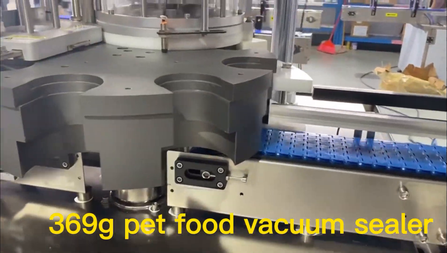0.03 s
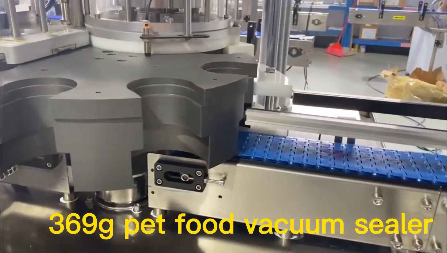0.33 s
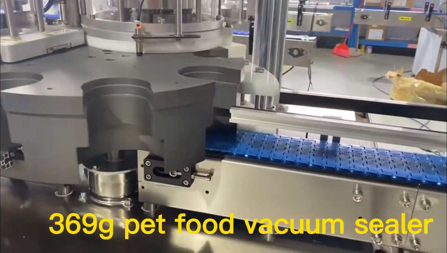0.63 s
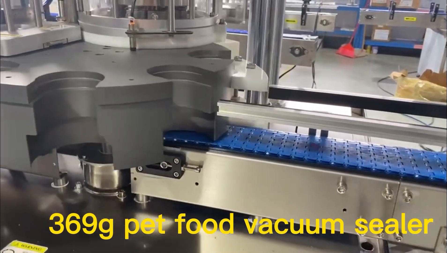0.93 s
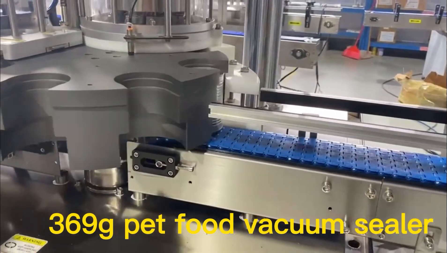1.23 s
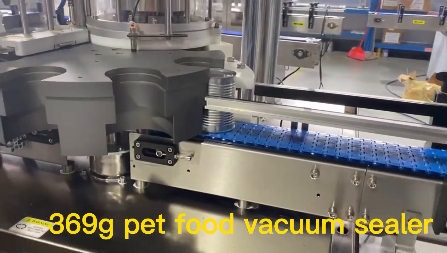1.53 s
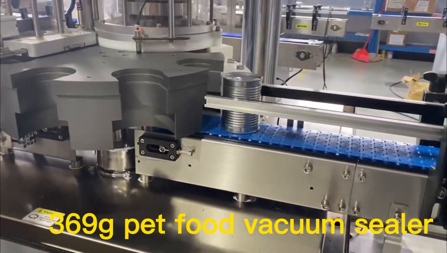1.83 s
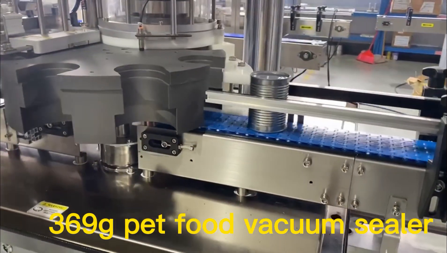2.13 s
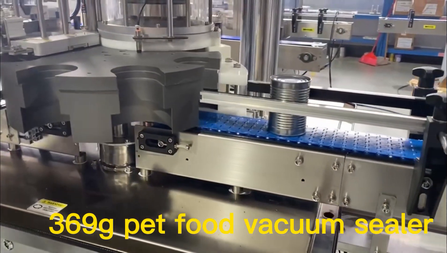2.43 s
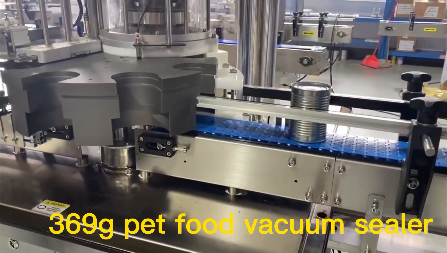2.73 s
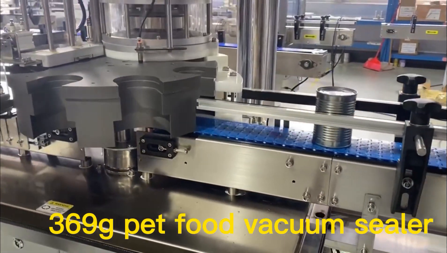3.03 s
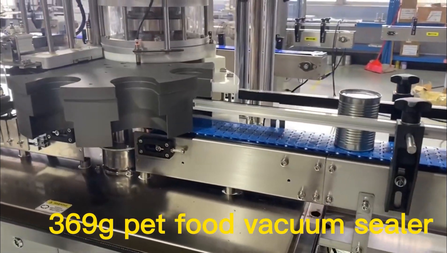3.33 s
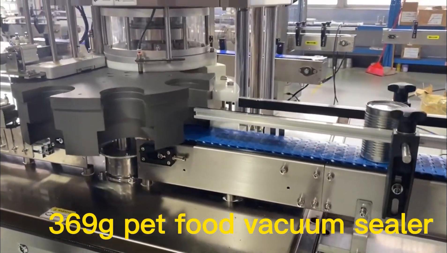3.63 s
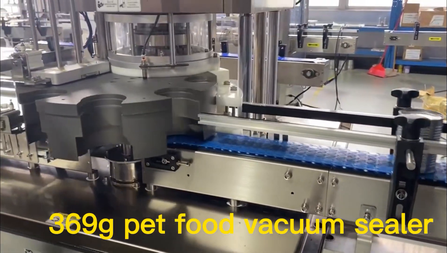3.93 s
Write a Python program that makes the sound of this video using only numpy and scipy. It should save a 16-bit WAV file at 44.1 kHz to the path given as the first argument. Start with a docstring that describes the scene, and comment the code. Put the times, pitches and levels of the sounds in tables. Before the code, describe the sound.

A can sealing machine runs in a workshop, its motors and conveyor rumbling with dull thumps and air puffs. A loud hiss bursts out, a can clinks along a rail, then a thin leak whistles as the clunks return.

```python
"""A rotary can sealer runs in a workshop: motors hum, the conveyor rumbles, the star wheel thumps dully.
First valves puff, the linkage taps and the mechanism clunks. At 1.3 s the vacuum chamber vents in a loud
hiss and a latch knocks. Near 2 s a can clinks along the rail as the belt carries it out. From 2.4 s air
leaks with a slowly sinking whistle. After 3 s the puffs and clunks return, and rubbed metal sings."""
import sys
import numpy as np
from scipy import signal
from scipy.fft import rfft, irfft, next_fast_len
from scipy.io import wavfile

SR = 44100
rng = np.random.default_rng(int(sys.argv[2]) if len(sys.argv) > 2 else 0)


def store_pcm(level_fs):
    """Save levels as 16-bit WAV."""
    pcm = np.round(np.clip(level_fs, -1, 1) * 32767).astype(np.int16)
    wavfile.write(sys.argv[1], SR, np.atleast_2d(pcm).T)


N = 176400
TIME = np.arange(N) / SR
FREQS = np.maximum(np.fft.rfftfreq(N, 1 / SR), 1)


# The chamber vents through a thin jet, then a wide port. Each row: start in seconds, level in dB,
# seconds held open, sag in dB per second, seconds to fade by 60 dB.
JET_OPENING = [(1.316, -18.5, 0.37, 6, 0.53)]
PORT_OPENING = [(1.43, -20, 0.038, 5, 0.8)]
# The tone colour of each hiss. Each row: frequency in Hz, relative level in dB.
JET_COLOUR = [(250, -3), (450, 1.5), (1300, 2.5), (2500, 4.5), (4000, 0), (6500, 1), (8000, -5), (11500, 1)]
PORT_COLOUR = [(500, 3), (1400, -7), (3300, 3), (4800, 6), (6300, -23), (12000, -30)]
# The chamber's resonances. Each row: frequency in Hz, boost in dB (a dip if negative).
CHAMBER_RESONANCES = [(938, 30.5), (1610, 18.5), (2010, 15), (2175, 1), (2440, -13), (2640, 12), (2992, 22),
                      (3380, 12.5), (3760, 10.5), (4580, -2), (4870, 5), (5600, -26), (7430, 17)]

def vent(jet_share=0.45):
    """The seal squeaks, then air rushes through the vacuum chamber and sounds its resonances."""
    squeak_level = from_db(-32) * np.exp(-((TIME - 1.286) / 0.010) ** 2)
    squeak = squeak_level * reedy_tone(hz=2170, width_hz=16)
    weaker_resonances = [(hz, jet_share * boost) for hz, boost in CHAMBER_RESONANCES]
    jet = valve_flow(JET_OPENING, attack_s=0.012) * noise(JET_COLOUR, weaker_resonances, ragged_db=5)
    port = valve_flow(PORT_OPENING, attack_s=0.046) * noise(PORT_COLOUR, CHAMBER_RESONANCES)
    sputter = from_db(drift(31))
    return squeak + (jet + port) * sputter


# The valves open. Each row: start in seconds, level in dB, seconds held open,
# sag in dB per second (a rise if negative), seconds to fade by 60 dB.
PUFFS = [(.158, -23.5, 0.018, 34, 0.34), (.22, -32, 0.16, -5, 0.14), (1.302, -16.5, 0.0063, 19, 0.071),
         (1.797, -24, 0.037, 30, 0.2), (2.2, -28.5, 0.042, 17, 0.18), (2.32, -23, 0.006, 50, 0.055),
         (3.258, -26.5, 0.06, 26, 0.15), (3.33, -34.5, 0.14, -8, 0.24)]
# The colour of a puff. Each row: frequency in Hz, relative level in dB.
PUFF_COLOUR = [(300, -41), (700, 3.5), (1300, 5), (2200, 2), (3200, -1), (5500, -2), (7500, -3),
               (12000, -3)]

def valves(sputter_db=2.0):
    """Valves let out short, sputtering puffs of exhaust air."""
    return valve_flow(PUFFS, attack_s=0.0083) * from_db(sputter_db * drift(47)) * noise(PUFF_COLOUR)


# Metal parts hit each other. Each row: start in seconds, relative level in dB.
CLUNKS = [(.349, -14.5), (.364, -22), (1.318, -23), (3.449, -18), (3.459, -18.5)]
KNOCKS = [(1.648, -14)]
TAPS = [(.165, -31), (.177, -25), (.292, -23), (.322, -27), (3.399, -25.5)]
# The tones each part rings with. Each row: pitch in Hz, relative level in dB, seconds to fade by 60 dB.
MECHANISM_TONES = [(331, 5.5, 0.082), (482, 3, .025), (590, -0.5, 0.033), (770, -5, .03),
                   (1084, -1.5, 0.097), (1226, 0, 0.04), (1313, 1.5, 0.032)]
LATCH_TONES = [(578, 4, 0.077), (733, 0.5, 0.086), (820, -3, .08)]
LINKAGE_TONES = [(1844, -2, 0.019), (2074, 0, 0.048), (2243, -2.9, 0.045)]

def mechanism():
    """The indexing mechanism, which steps the cans along, clunks; a latch knocks and the linkage taps."""
    clunks = struck(CLUNKS, MECHANISM_TONES)
    knocks = struck(KNOCKS, LATCH_TONES)
    taps = struck(TAPS, LINKAGE_TONES)
    return from_db(-5.5) * (clunks + knocks + taps)


# The can hits the guide rail. Each row: start in seconds, relative level in dB.
CLINKS = [(1.961, -22.5), (1.972, -23), (1.985, -26.5), (2.018, -25), (2.027, -29), (2.06, -27.5),
          (2.324, -33.5)]
# The can's ringing tones. Each row: pitch in Hz, relative level in dB, seconds to fade by 60 dB.
CAN_TONES = [(1078, 6, 0.072), (1250, -12, 0.064), (2998, 3, 0.08), (3050, -8, 0.23), (3940, -5.5, 0.075),
             (5039, -2.5, 0.13), (5630, -9, .1), (6142, -9, .13), (7485, 1.5, 0.11), (9950, -12, 0.12),
             (11750, -11.5, 0.14)]

def can(contact_s=0.0052):
    """The can chatters along the rail in short bounces, ringing and scraping at each."""
    ring = from_db(-8.5) * struck(CLINKS, CAN_TONES, contact_s, grit=0.11)
    scrape_level = sum(from_db(db) * (TIME > s) * np.exp(-abs(TIME - s) / contact_s) for s, db in CLINKS)
    return ring + scrape_level * rng.standard_normal(N)


# How loud the leak hisses. Each row: time in seconds, level in dB.
LEAK_LEVEL = [(0, -47), (.12, -31), (.3, -47), (2.38, -65), (2.45, -38.5), (2.8, -37.5), (3.06, -29.5),
              (3.2, -34.5), (3.29, -24.5), (3.49, -29.5), (3.72, -28.5), (3.8, -35), (3.88, -29)]
# The colour of that hiss. Each row: frequency in Hz, relative level in dB.
LEAK_COLOUR = [(1500, -6), (3000, 0.5), (5500, 2), (7000, 2), (12000, 6)]
# The leak's whistle. Each row: time in seconds, pitch in Hz, relative level in dB.
WHISTLE = [(2.4, 7800, -59), (3.05, 7060, -48.5), (3.3, 6780, -41), (3.5, 6765, -40), (3.71, 6585, -37),
           (4, 6410, -46)]

def leak(lock_db=-42):
    """A thin hiss whose whistle sinks with the pressure, airy until strong enough to lock into a tone."""
    hiss_db, = in_time(LEAK_LEVEL)
    hz, whistle_db = in_time(WHISTLE)
    locked = from_db(np.minimum(whistle_db - lock_db, 0))
    clear = locked * reedy_tone(hz, width_hz=14)
    airy = from_db(2) * reedy_tone(hz, width_hz=150)
    hiss = from_db(hiss_db) * noise(LEAK_COLOUR, ragged_db=10.5)
    return hiss + from_db(whistle_db) * (clear + airy)


# The tones of rubbed metal. Each row: pitch in Hz, relative level in dB.
ROLLER_TONES = [(3731, -40.5), (3865, -41), (5010, -43), (5529, -39.5), (6686, -32.5), (10282, -39),
                (11063, -39)]

def rollers():
    """Rubbed metal, probably the seaming rollers, swells near the end with a rasp around each tone."""
    swell_db = np.interp(TIME, [3.1, 3.55, 3.82, 3.93], [-60, -13, -7, 0])
    out = 0
    for hz, db in ROLLER_TONES:
        tone = reedy_tone(hz, width_hz=16)
        rasp = from_db(-6) * reedy_tone(hz, width_hz=70)
        out += from_db(db) * (tone + rasp)
    return from_db(swell_db) * out


# How loud the drive rumbles. Each row: time in seconds, level in dB.
RUMBLE_LEVEL = [(0, -17.5), (.4, -20), (.6, -30), (.9, -41), (1.27, -30.5), (1.85, -22.5), (2.15, -26.5),
                (2.35, -28), (3.15, -27), (3.29, -21.5), (3.65, -23.5), (3.8, -28.5), (4, -54)]
# The colour of that rumble. Each row: frequency in Hz, relative level in dB.
RUMBLE_COLOUR = [(20, -36), (45, 2), (75, 5), (125, -1.5), (175, 3.5), (260, -10), (360, -7), (480, -24),
                 (1200, -54.5)]
# The wheel and frame thump. Each row: start in seconds, relative level in dB, pitch in Hz.
THUMPS = [(.008, -5.5, 180), (0.096, -14, 113), (.171, -12, 143), (.257, -5, 98), (0.37, -7, 69.6),
          (.529, -11, 142), (1.124, -11.5, 63.4), (1.324, -6, 76), (1.388, -8.5, 82), (1.48, -12.5, 154),
          (1.539, -7.5, 86), (1.674, -8, 86), (1.798, -6.5, 82), (2.179, -8.5, 72.6), (2.362, -6.5, 98),
          (3.322, -5, 154), (3.436, -8, 186), (3.452, -4.5, 109.4), (3.49, -6.5, 210), (3.514, -11, 148),
          (3.56, -5, 79), (3.598, -9, 165), (3.619, -5, 224), (3.754, -7, 79), (3.848, -13, 247)]

def star_wheel(rise_s=0.0057, overtone_ratio=2.36):
    """The drive of the notched wheel rumbles, and the frame answers with soft, short thumps."""
    rumble_db, = in_time(RUMBLE_LEVEL)
    out = from_db(rumble_db + drift(54)) * noise(RUMBLE_COLOUR)
    for start, db, hz in THUMPS:
        age = np.maximum(TIME - start, 0)
        swell = age / rise_s * np.exp(1 - age / rise_s)
        phase = 2 * np.pi * hz * age
        overtone = from_db(-17.5) * np.sin(overtone_ratio * phase + 2 * np.pi * rng.random())
        out += from_db(db - 3) * swell * (np.sin(phase) + overtone)
    return out


# How loud the loaded belt is. Each row: time in seconds, level in dB.
BELT_LEVEL = [(1.4, -49), (2, -29), (3.1, -28.5), (3.6, -45)]
# The colour of its drone. Each row: frequency in Hz, relative level in dB.
BELT_COLOUR = [(70, -7), (160, 8.5), (380, 5), (520, -25)]

def belt():
    """The slat belt drones evenly while it carries the can."""
    drone_db, = in_time(BELT_LEVEL)
    return from_db(drone_db) * noise(BELT_COLOUR)


# The machinery's steady roar and faint hiss. Each row: frequency in Hz, relative level in dB.
ROAR_COLOUR = [(20, -46), (40, -3.5), (62, 1.5), (120, -5.5), (220, -7), (350, -10.5), (430, -12.5),
               (620, -9.5), (900, -16), (1400, -23.5), (2500, -27), (4000, -30.5)]
HISS_COLOUR = [(6000, -36), (8000, -39), (12000, -41)]
# Motor hum and thin electrical whine. Each row: pitch in Hz, level in dB.
HUM = [(64, -39), (313, -39.5), (586, -42), (802, -48)]
WHINE = [(11960, -58), (12344, -60)]

def machinery(roar_db=-26, wander_hz=2.866, flutter_db=3.5):
    """Motors and conveyor make a lightly rattling roar with wavering tones."""
    out = from_db(roar_db + drift(30)) * noise(ROAR_COLOUR + HISS_COLOUR)
    for hz, db in HUM + WHINE:
        phase = 2 * np.pi * np.cumsum(hz + wander_hz * drift(5.34)) / SR
        out += np.sqrt(2) * from_db(db + flutter_db * drift(22)) * np.sin(phase)
    return out


def workshop_echoes(sound, fade_s=0.16):
    """Sound bounces between hard walls; only the echoes are returned."""
    size = next_fast_len(N + SR)
    hz = np.fft.rfftfreq(size, 1 / SR)
    response = 0
    for k, delay_s in enumerate(rng.uniform(.009, .045, size=10)):
        round_trip = from_db(-60 * delay_s / fade_s) * np.exp(-2j * np.pi * hz * delay_s)
        response += (-1) ** k * round_trip / (1 - round_trip)
    response /= np.sqrt(np.mean(abs(response) ** 2))
    return irfft(rfft(sound, size) * response, size)[:N]


def valve_flow(openings, attack_s):
    """The airflow of each opening rises, sags as the pressure changes and dies away when shut."""
    power = 0
    for start, db, hold_s, sag, fade_s in openings:
        age = np.maximum(TIME - start, 0)
        rise = np.minimum(age / attack_s, 1)
        fall_db = sag * np.minimum(age, hold_s) + 60 * np.maximum(age - hold_s, 0) / fade_s
        power += (rise * from_db(db - fall_db)) ** 2
    return np.sqrt(power)


def struck(hits, tones, contact_s=0.0038, grit=0.087):
    """Each hit is a click and a brief gritty scrape that rings every tone with a strength of its own."""
    out = np.zeros(N)
    swell = TIME[:SR // 10] / contact_s
    for hz, tone_db, fade_s in tones:
        force = np.zeros(N + SR)
        for start, db in hits:
            contact = grit * rng.standard_normal(len(swell)) * swell * np.exp(1 - swell)
            contact[0] += rng.choice([-1, 1])  # the click
            first = int(start * SR)
            force[first:first + len(swell)] += from_db(db + tone_db) * contact
        decay, angle = from_db(-60 / (fade_s * SR)), 2 * np.pi * hz / SR
        feedback = [1, -2 * decay * np.cos(angle), decay ** 2]
        out += signal.lfilter([0, np.sin(angle)], feedback, force[:N] + 1e-18)
    return out


def noise(colour, resonances=(), ragged_db=0, ragged_hz=44.2, sharpness=74):
    """Noise with a broad colour, narrow resonances and the ragged peaks that nearby metal walls add."""
    hz, db = np.transpose(colour)
    shape_db = np.interp(np.log(FREQS), np.log(hz), db)
    knots = np.arange(SR // 20) * ragged_hz
    shape_db += ragged_db * np.interp(FREQS, knots, rng.uniform(-1, 1, len(knots)))
    for centre, boost in resonances:
        shape_db += boost / (1 + (sharpness * (FREQS / centre - 1)) ** 2)
    return unit_power(irfft(rfft(rng.standard_normal(N)) * from_db(shape_db), N))


def reedy_tone(hz, width_hz):
    """A narrow resonance stirred by turbulence: the wider, the breathier."""
    phase = 2 * np.pi * np.cumsum(hz * np.ones(N)) / SR
    return unit_power(drift(width_hz) * np.cos(phase) + drift(width_hz) * np.sin(phase))


def drift(rate_hz):
    """A smooth random wobble with a typical size of 1."""
    return unit_power(irfft(rfft(rng.standard_normal(N)) / (1 + (FREQS / rate_hz) ** 2), N))


def in_time(rows):
    """Join timed rows with straight lines, one curve for each column after the time."""
    seconds, *columns = np.transpose(rows)
    return [np.interp(TIME, seconds, column) for column in columns]


def unit_power(x):
    """Scale to an average power of 1."""
    return x / np.sqrt(np.mean(x ** 2) + 1e-20)


def from_db(db):
    """Turn decibels into a multiplier."""
    return 10 ** (np.asarray(db) / 20)


def scene():
    """All sources in one channel; only the sharper ones echo."""
    sharp = mechanism() + valves() + vent() + leak() + rollers() + can()
    background = machinery() + star_wheel() + belt()
    return (sharp + background + from_db(-7) * workshop_echoes(sharp))[None]


def record(dry, dip_hz=9000, dip_width_hz=650, dip_db=-14, cutoff_hz=13300):
    """The treble dips in one band, and the very top is cut steeply."""
    dip = from_db(dip_db * np.exp(-((FREQS - dip_hz) / dip_width_hz) ** 2))
    lowpass = signal.cheby2(20, 70, cutoff_hz, fs=SR, output="sos")
    return signal.sosfilt(lowpass, irfft(rfft(dry) * dip, N))


dry = scene()
out = record(dry)
store_pcm(out)
```